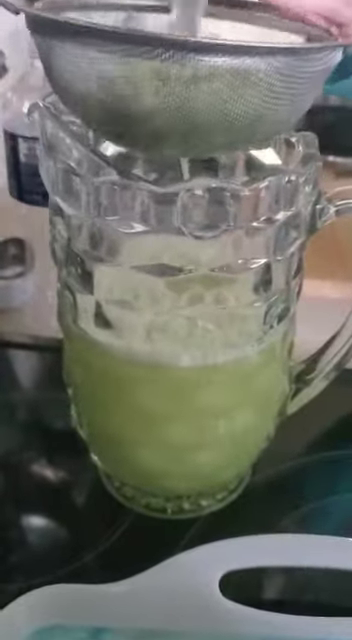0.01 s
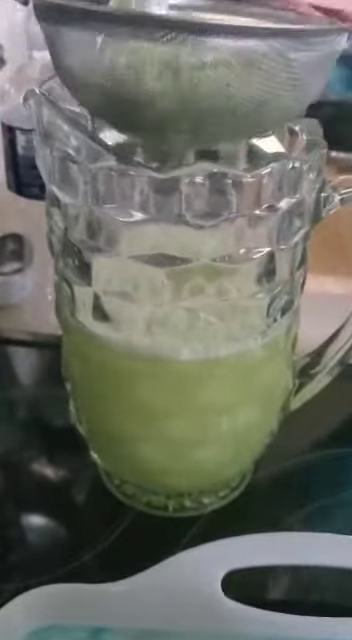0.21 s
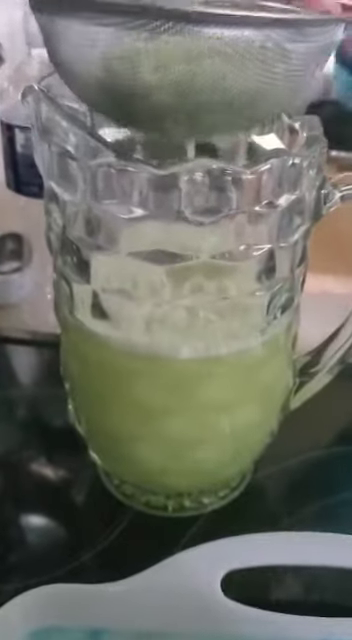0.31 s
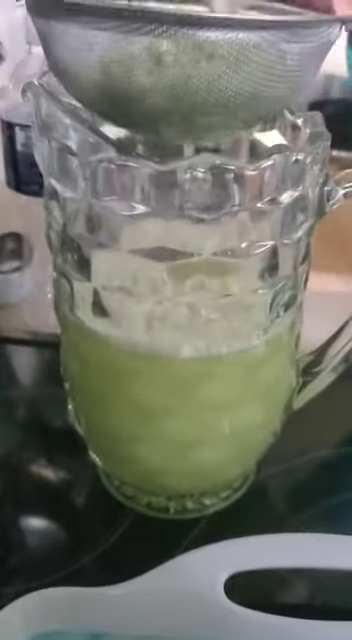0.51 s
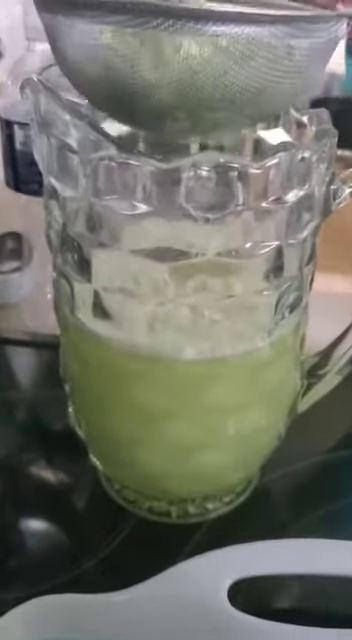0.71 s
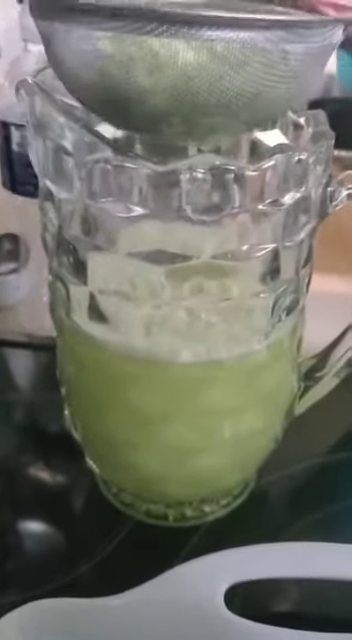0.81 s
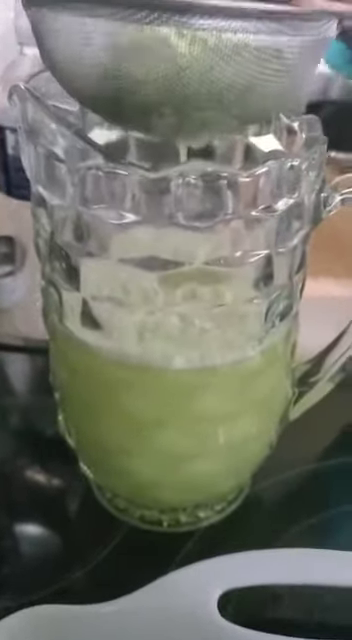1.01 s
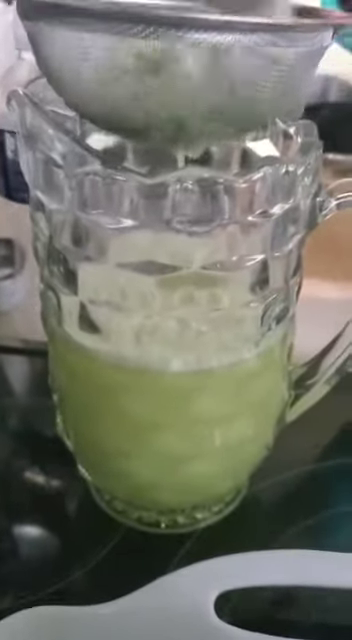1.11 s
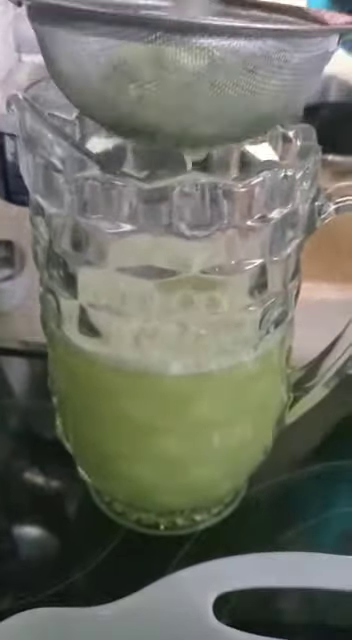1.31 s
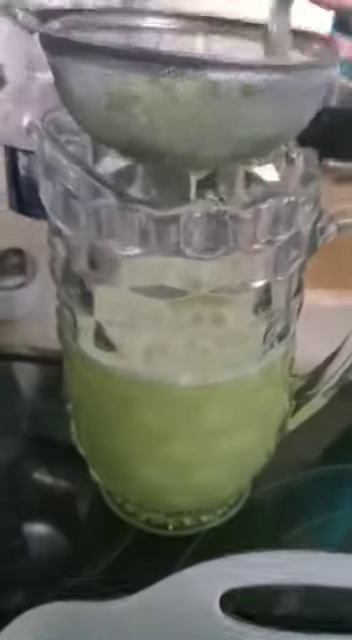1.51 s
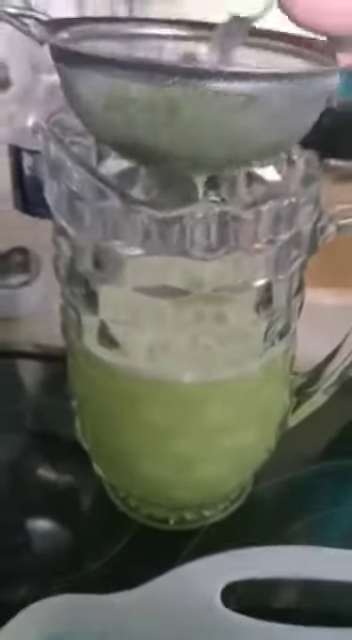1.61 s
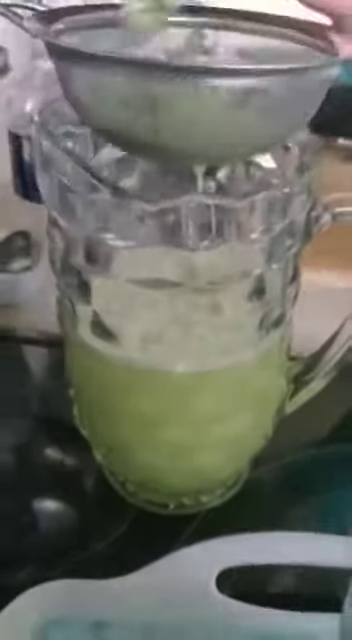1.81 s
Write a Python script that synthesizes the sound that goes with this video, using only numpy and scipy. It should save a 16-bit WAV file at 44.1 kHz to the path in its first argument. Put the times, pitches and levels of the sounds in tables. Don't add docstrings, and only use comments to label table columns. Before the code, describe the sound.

Close up in a kitchen, a metal spoon clanks once on a mesh strainer, rubs softly with wet clicks, scrapes three times in quick succession, and ticks on over a faint low rumble.

```python
import sys
import numpy as np
from scipy import signal
from scipy.fft import rfft, irfft
from scipy.io import wavfile
from scipy.ndimage import uniform_filter1d

SR = 44100
rng = np.random.default_rng(int(sys.argv[2]) if len(sys.argv) > 2 else 0)


def voltage_ratio(decibels):
    exponent = np.asarray(decibels, float) / 20
    return 10 ** exponent


def to_wav(s):
    ch = np.atleast_2d(s).T
    pcm = np.round(np.clip(ch, -1, 1) * 32767)
    wavfile.write(sys.argv[1], SR, pcm.astype(np.int16))


N = 81585
T = np.arange(N) / SR


def evened(x):
    return x / np.sqrt(np.mean(x ** 2) + 1e-20)


def read(points, hz):
    f, value = np.transpose(points)
    return np.interp(np.log(hz + 1), np.log(f + 1), value)


def colour(x, points):
    level_db = np.maximum(read(points, np.abs(np.fft.fftfreq(4096, 1 / SR))), -100)
    log_gain = np.log(voltage_ratio(level_db))
    taps = np.fft.ifft(np.exp(np.conj(signal.hilbert(log_gain)))).real[:2048]
    return signal.oaconvolve(x, taps / np.linalg.norm(taps))[:N]


def ring(x, modes):
    t = T[:SR // 2]
    body = sum(voltage_ratio(db - 60 * t / t60) * np.sin(2 * np.pi * hz * t) for hz, db, t60 in modes)
    return signal.oaconvolve(x, body / np.linalg.norm(body))[:N]


def resonate(x, hz, width_hz):
    r = np.exp(-np.pi * width_hz / SR)
    return signal.lfilter([1, 0, -r], [1, -2 * r * np.cos(2 * np.pi * hz / SR), r * r], x)


def stroke(start, length, rise, t60):
    release = np.clip(T - start - length, 0, 9)
    return np.clip((T - start) / rise, 0, 1) * voltage_ratio(-60 * release / t60)


def grit(spread_db, lump_db):
    lumps = evened(uniform_filter1d(rng.standard_normal(N), size=150))
    catches = np.minimum(rng.exponential(1, N), 4)
    return evened(rng.standard_normal(N) * voltage_ratio(spread_db * catches + lump_db * lumps))


# time_s, level_db
RUMBLE = [(0, -62.5), (.05, -72), (.6, -70.5), (.75, -80.5), (.88, -76), (.95, -67), (1.05, -71),
          (1.3, -78.5), (1.55, -72.5), (1.7, -65), (1.85, -59)]
# freq_hz, density_db
RUMBLE_COLOUR = [(12, -20), (20, -13), (39, -4.5), (64, 1.5), (82, -0.5), (211, -18.5), (242, -17),
                 (300, -23), (390, -18.5), (660, -120)]
# freq_hz, density_db
AIR_COLOUR = [(88, -39.5), (150, -2), (492, 1), (563, -13.5), (646, -3), (1110, -13.5), (1230, -13.5),
              (2420, -12.5), (15700, -38.5)]


def kitchen():
    a, b, c, d = rng.standard_normal((4, N))
    same = .6
    right = same * a + np.sqrt(1 - same ** 2) * b
    low = np.array([colour(v, RUMBLE_COLOUR + [(600, -71.0)]) for v in (a, right)])
    rumble = voltage_ratio(1.5) * low * voltage_ratio(np.interp(T, *np.transpose(RUMBLE)))
    thud_s, thud_width_s = 1.828, .0011
    u = (T - thud_s) / thud_width_s
    thud = voltage_ratio(-44) * u * np.exp(-u * u)
    air = np.array([colour(v, [(60, -35)] + AIR_COLOUR) for v in (c, d)])
    return rumble + thud + voltage_ratio(-79) * air


# time_s, level_db
RUB = [(0, -65.5), (.06, -70.5), (.11, -72.5), (.19, -80.5), (.33, -62.5), (.5, -68.5), (.565, -73),
       (.585, -66), (.7, -67.5), (.77, -82), (.9, -79), (1.0, -81), (1.2, -66), (1.3, -63), (1.41, -76),
       (1.5, -76.5), (1.53, -63.5), (1.85, -73.5)]
# freq_hz, density_db
RUB_COLOUR = [(300, -37), (1000, -10), (3000, -7.5), (6000, -8.5), (9000, 2), (10500, -9.5), (12000, 5.5),
              (15800, -6.5)]


def rubbing():
    light = grit(1.3, 0.64) * voltage_ratio(np.interp(T, *np.transpose(RUB)))
    return colour(light, RUB_COLOUR)


# start_s, peak_db, pitch_hz, bright_share_db
TICKS = [(0.0297, -64.5, 4700, -4), (0.0583, -55, 4600, -12), (0.077, -62.5, 4600, -8),
         (0.3767, -43, 3080, -5.5), (0.378, -51, 1400, -17), (0.4088, -53, 8060, 10),
         (0.4342, -42.5, 2540, 1), (0.433, -47, 4560, -17), (0.484, -65, 8450, 9),
         (0.4907, -55.5, 2730, 12), (0.5815, -56, 9600, -8), (0.628, -54.5, 9150, -7),
         (0.667, -55.5, 7400, -1), (0.931, -46, 9400, 10.5), (0.9698, -35, 2860, -11.5),
         (1.002, -49.5, 8700, 1), (1.026, -42.5, 2670, -15), (1.0414, -47.5, 8900, 14),
         (1.202, -53.5, 2860, -17), (1.2317, -51, 2290, -14), (1.276, -50, 2250, -22),
         (1.296, -60.5, 3870, -12), (1.324, -53.5, 5500, -16), (1.341, -35, 2820, -9),
         (1.34, -48.5, 5700, -15), (1.3515, -42.5, 2690, -13), (1.35, -52, 3870, -5),
         (1.365, -61, 2760, -10), (1.383, -48, 2500, -20), (1.3924, -62.5, 10400, 18),
         (1.4228, -52.5, 5900, -0.5), (1.4285, -52.5, 2600, -27), (1.446, -51.5, 2650, -16),
         (1.476, -61.5, 5500, -7), (1.517, -56.5, 3200, 7.5), (1.5413, -52.5, 4770, 3),
         (1.585, -55, 5260, -20), (1.6551, -53.5, 13500, -13), (1.708, -58.5, 5650, 11),
         (1.78, -53.5, 10800, -4)]


def ticks():
    tick_q, trim_db = 4.5, -8
    noise = grit(1.1, 3.0)
    bright = colour(noise, RUB_COLOUR)
    out = np.zeros(N)
    for s, db, hz, bright_db in TICKS:
        shape = stroke(s, length=.003, rise=.0005, t60=.02)
        own = shape * resonate(resonate(noise, hz, hz / tick_q), hz, 2 * hz / tick_q)
        own *= np.linalg.norm(shape) / np.linalg.norm(own)
        out += voltage_ratio(db + trim_db) * (own + voltage_ratio(bright_db) * shape * bright)
    return out


# start_s, length_s, level_db, pitch_hz
HUMS = [(.1, .012, -67, 1720), (.12, .012, -69, 2020), (.38, .14, -71, 402), (.39, .045, -73, 970),
        (.38, .015, -67, 1870), (.39, .04, -73, 3230), (.41, .012, -72, 1370), (.435, .015, -67, 1830),
        (.515, .025, -70, 1830), (.595, .08, -72, 604), (.68, .04, -79, 400), (.93, .045, -54, 600),
        (.93, .24, -70, 402), (.975, .008, -62, 1870), (.999, .016, -57, 1870), (1.033, .02, -56, 1860),
        (1.052, .018, -55, 598), (1.103, .032, -58, 597), (1.085, .05, -62, 2540), (1.236, .015, -71, 2050),
        (1.278, .055, -68, 408), (1.282, .014, -64, 1860), (1.295, .025, -70, 2280),
        (1.278, .04, -72, 1260), (.204, .022, -54, 598), (1.328, .006, -69, 2280), (1.342, .045, -74, 410),
        (1.345, .012, -69, 1850), (1.37, .006, -67, 1860), (1.387, .02, -63, 1850), (1.38, .02, -71, 2850),
        (1.428, .026, -69, 1780), (1.436, .006, -67, 2600), (1.718, .012, -66, 2015),
        (1.73, .05, -74, 1580), (1.8, .02, -73, 2010), (1.69, .13, -75, 408), (1.043, .085, -53, 13220),
        (1.58, .22, -82, 600), (.26, .02, -62, 1875)]


def hums():
    pure_below_hz, pure_above_hz = 910, 357
    noise, out = rng.standard_normal(N), np.zeros(N)
    for s, length, db, hz in HUMS:
        width_hz = min(14 + 70 * (hz / 2000) ** 2, 180)
        fuzz = evened(resonate(resonate(noise, hz, width_hz), hz, hz / 8))
        purity = 1.5 / (1 + (hz / pure_below_hz) ** 4) / (1 + (pure_above_hz / hz) ** 6)
        pure = purity * np.sin(2 * np.pi * hz * (T - s))
        out += voltage_ratio(db) * stroke(s, length, rise=.002, t60=.03) * evened(pure + 0.62 * fuzz)
    return out


# pitch_hz, level_db, t60_s
STEEL = [(7560, -6, .1), (8180, -3, .15), (8560, -4, .12), (9000, -6, .12), (9840, -8, .2), (10300, -6, .1),
         (11010, -5, .15), (11680, -6, .1), (12195, -1, .2), (12423, -3, .3), (13140, -4, .1),
         (13300, 2, .2), (14730, 0, .12), (15100, -4, .1)]
# pitch_hz, level_db, t60_s
RIM = [(598, 3, .16), (1430, -10, .08), (1875, -4, .11), (2535, -5, .1), (3270, -7, .05), (3770, -11, .06),
       (4660, -5, .06), (4870, -10, .06), (5310, -12, .05), (6120, -9, .07), (6570, -9, .03)]
# freq_hz, density_db
TAP_COLOUR = [(250, -57), (450, -32), (3300, -10.5), (4700, -27.5), (6900, -11.5), (7700, -3.5),
              (13000, 0.5), (15800, -1)]
# freq_hz, density_db
CLANK_COLOUR = [(300, -46.5), (700, -7.5), (1500, -3.5), (3000, 2), (4200, -7), (5000, -5), (7000, -2.5),
                (15800, -22)]


def tap():
    tap_s, bounce_s = .2006, .2045
    noise = rng.standard_normal((3, N))
    crack = voltage_ratio(-19.5) * noise[0] * stroke(tap_s, .001, .0002, t60=.023)
    bounce = voltage_ratio(-21) * noise[0] * stroke(bounce_s, .0036, .0049, t60=.012)
    shimmer = voltage_ratio(-34.5) * noise[1] * stroke(tap_s, .0061, .00027, t60=.28)
    clank = voltage_ratio(-45.5) * noise[2] * stroke(tap_s, .0068, .00074, t60=.3)
    blow = 38.0 * (np.arange(N) == round(tap_s * SR))
    wires = colour(bounce + crack + shimmer, TAP_COLOUR)
    bowl = colour(clank, CLANK_COLOUR) + voltage_ratio(-3) * ring(clank, RIM)
    return wires + bowl + voltage_ratio(-34.5) * ring(blow, STEEL) + voltage_ratio(-50) * ring(blow, RIM)


SCRAPE_STARTS = (.919, 1.002, 1.041)
# length_s, level_db, release_t60_s
SCRAPES = [
    (0.044, -52.5, 0.12),
    (0.0016, -53, 0.17),
    (0.083, -48, 0.15),
]
# freq_hz, density_db
SCRAPE_COLOUR = [(200, -44), (400, -9.5), (900, -9), (2500, -2.5), (5600, -13.5), (8500, -2.5),
                 (13500, -5.5), (15800, -14.5)]


def scraping():
    pressure = np.zeros(N)
    for s, (length, db, fall) in zip(SCRAPE_STARTS, SCRAPES):
        pressure += voltage_ratio(db) * stroke(s, length, .003, fall)
    firm = grit(2.8, 3.4) * pressure
    rim = ring(firm, RIM[1:])
    return colour(firm, SCRAPE_COLOUR) + voltage_ratio(-11) * ring(firm, STEEL) + voltage_ratio(-8) * rim


def room(x):
    taps = np.zeros((2, SR // 2))
    at = np.arange(60, SR // 2 - 20, 20) + rng.integers(0, 20, (2, (SR // 2 - 61) // 20))
    np.put_along_axis(taps, at, rng.choice([-1., 1.], at.shape), 1)
    taps *= voltage_ratio(-60 * T[:SR // 2] / .1)
    return signal.fftconvolve(x[None], taps / np.linalg.norm(taps[0]), axes=1)[:, :N]


def scene():
    low_cut = signal.butter(4, 390, 'high', fs=SR, output='sos')
    near = signal.sosfilt(low_cut, rubbing() + ticks() + tap() + scraping()) + hums()
    lag_s = .0002
    hz = np.fft.rfftfreq(N, 1 / SR)
    late = irfft(rfft(near) * np.exp(-2j * np.pi * hz * lag_s), N)
    return voltage_ratio(1.0) * np.array([near, late]) + voltage_ratio(-2.5) * room(near) + kitchen()


def roll_off(x):
    return signal.sosfilt(signal.butter(12, 17110, fs=SR, output="sos"), x)


# freq_hz, left_minus_right_db
LEAN = [(60, -5.5), (130, -4.5), (290, -4), (640, 7), (1410, -6), (3100, -5), (6820, -7.5), (15000, 1.5)]


def record(dry):
    hz = np.fft.rfftfreq(N, 1 / SR)
    balance = voltage_ratio(read(LEAN, hz) * np.array([[.5], [-.5]]))
    edge = np.sqrt(1 + (hz / 15480) ** 160)
    mix = irfft(rfft(dry, axis=1) * balance / edge, N, axis=1)
    return roll_off(mix)


dry = scene()
out = record(dry)
to_wav(out)
```